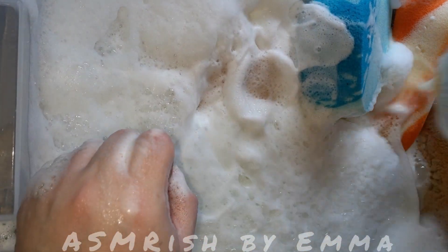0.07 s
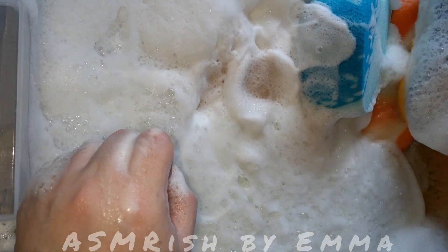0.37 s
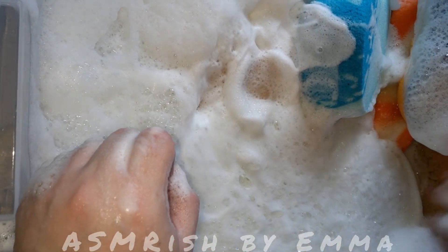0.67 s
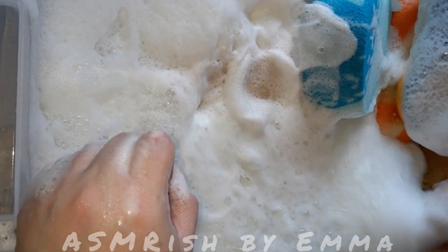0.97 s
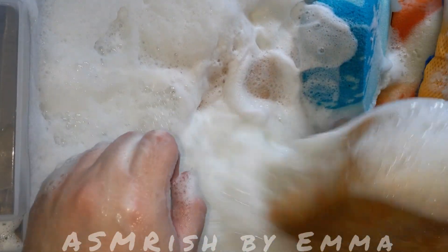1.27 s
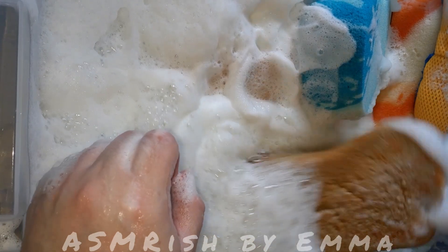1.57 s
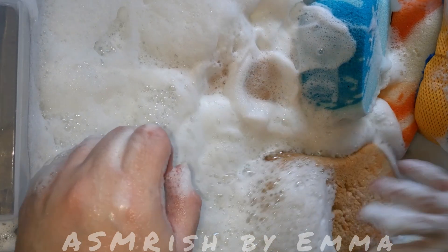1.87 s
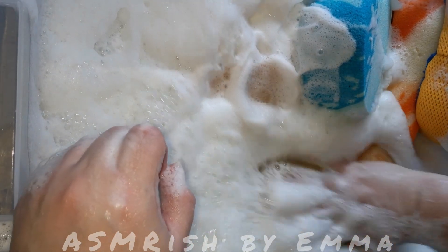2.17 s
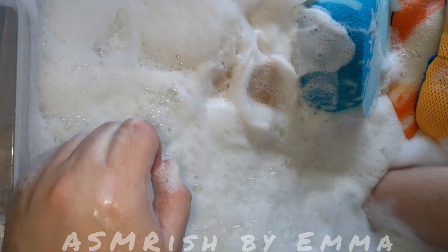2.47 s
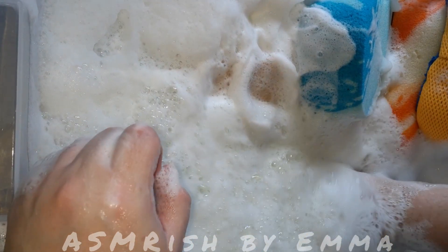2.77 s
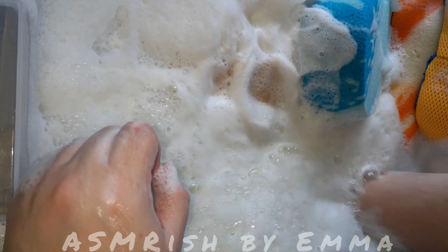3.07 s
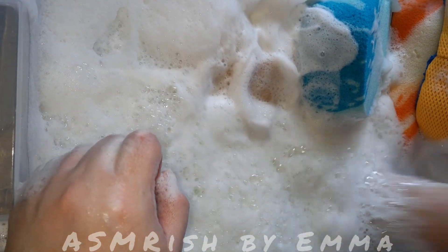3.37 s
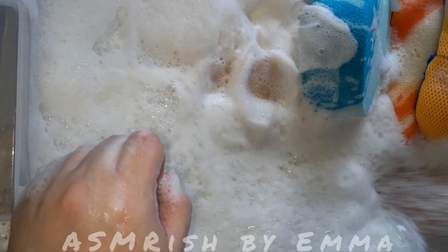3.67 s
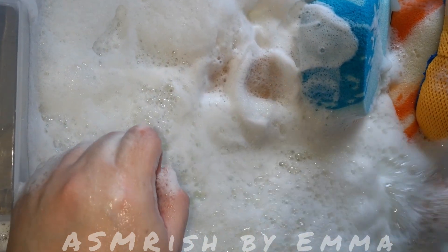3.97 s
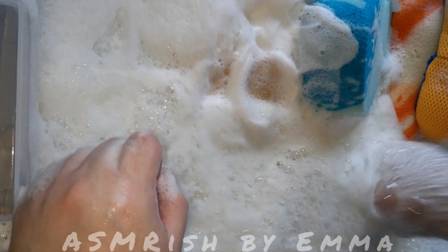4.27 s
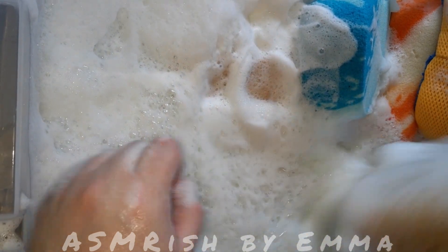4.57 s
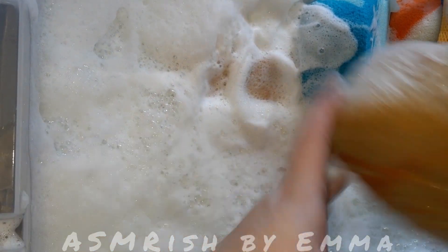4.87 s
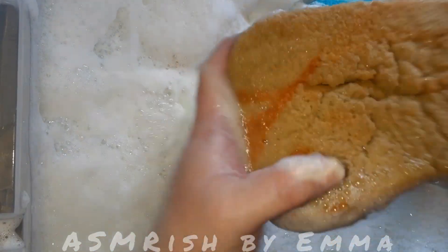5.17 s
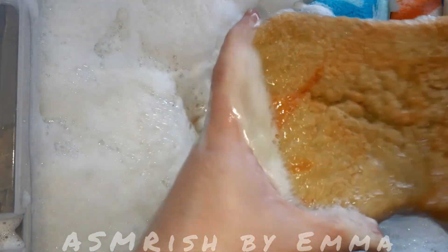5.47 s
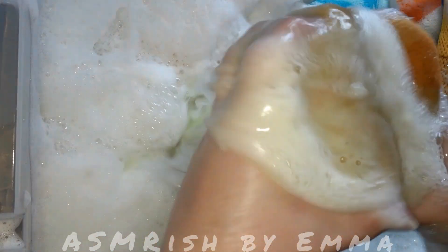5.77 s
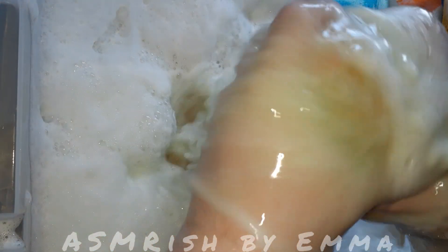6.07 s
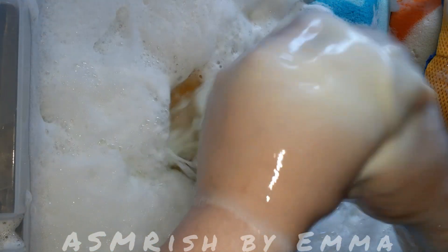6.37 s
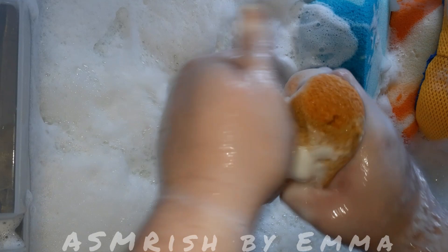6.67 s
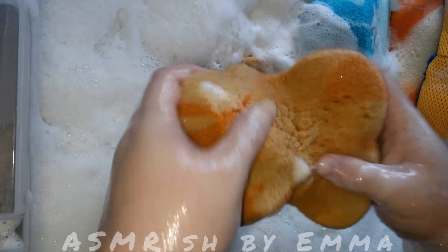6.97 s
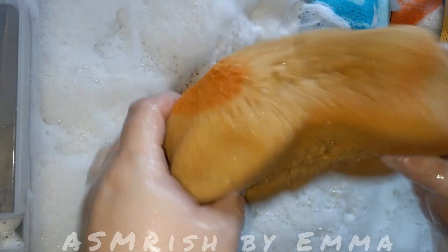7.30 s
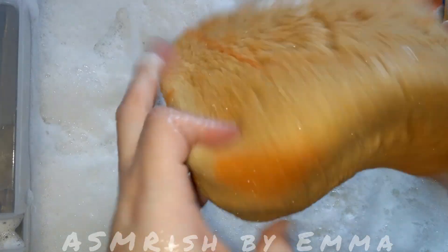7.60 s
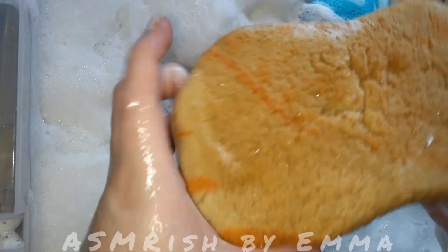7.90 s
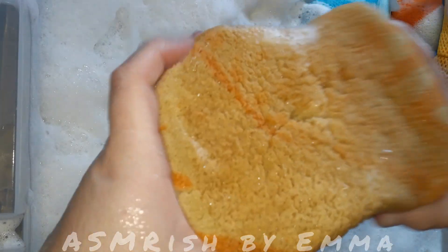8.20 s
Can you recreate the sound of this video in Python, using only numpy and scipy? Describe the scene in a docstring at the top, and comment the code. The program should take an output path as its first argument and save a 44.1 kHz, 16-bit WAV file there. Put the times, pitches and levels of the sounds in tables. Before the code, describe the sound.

Soap foam fizzes softly as a soaked sponge is pushed down in a plastic bin, gurgling, then lifted and squeezed with wet squelches.

```python
"""A sponge in thick suds

Wet hands press a sponge down in a plastic bin of suds, lift it, wring it out and let it swell again.
Each bursting bubble is a small damped resonator: thousands make the fizz of the foam, the sizzle of
the pores and the squelch of wringing. Larger air pockets throb and gulp from under the sponge.
A fan hums in the small room, and two close microphones hear the bin slightly from the left."""
import sys
import numpy as np
from scipy import signal
from scipy.fft import rfft, irfft, next_fast_len
from scipy.io import wavfile
from scipy.ndimage import uniform_filter1d

SR = 44100
rng = np.random.default_rng(int(sys.argv[2]) if len(sys.argv) > 2 else 0)


def materialize(psi):
    """Save the field psi as 16-bit PCM at rate SR to the path in sys.argv[1].

    A 1-D psi becomes a single channel; in a 2-D psi each row is a channel.
    """
    bounded = np.clip(np.atleast_2d(psi).T, -1, 1)
    quanta = np.round(bounded * 32767).astype(np.int16)
    wavfile.write(sys.argv[1], SR, quanta)


N = 372204
TIME = np.arange(N) / SR

# likeness of the room's sound at the two microphones: f/Hz, correlation
ROOM_COHERENCE = [(60, 0.91), (130, 0.96), (290, 0.55), (640, 1), (1400, 0.1), (15000, 0)]
# spectrum of flying droplets: f/Hz, gain/dB
SPRAY_SPECTRUM = [(400, -20.5), (900, -1), (1500, -4.5), (2200, -9.5), (3000, -21), (4000, -28),
                  (5300, -35), (9000, -69)]


def gain_of(db):
    """Amplitude ratio: a factor of ten per 20 dB."""
    return 10 ** (np.asarray(db) / 20)


def at_hz(points, hz):
    """Interpolation on a logarithmic frequency axis."""
    f, value = np.transpose(points)
    return np.interp(np.log(hz + 1), np.log(f + 1), value)


def envelope(rows, column=1):
    """Amplitude envelope from a dB curve, silent outside its span."""
    rows = np.asarray(rows)
    inside = (TIME >= rows[0, 0]) & (TIME <= rows[-1, 0])
    return gain_of(np.interp(TIME, rows[:, 0], rows[:, column])) * inside


def unit_rms(x):
    """Normalisation: the mean of the channels gets rms 1."""
    return x / np.sqrt(np.mean(x.mean(0) ** 2) + 1e-20)


def steadied(x, span_s):
    """Division by the running rms levels slow changes and keeps the faster grain."""
    x, size = unit_rms(x), max(int(span_s * SR), 8)
    power = uniform_filter1d(uniform_filter1d(x.mean(0) ** 2, size), size)
    return x / np.sqrt(abs(power) + 1e-6)


def add(mix, start_s, sound):
    """Superposition: a sound joins the mix at start_s."""
    part = mix[:, max(round(start_s * SR), 0):][:, :sound.shape[1]]
    part += sound[:, :part.shape[1]]


def coloured(x, spectrum):
    """Minimum-phase filtering shapes the spectrum and keeps the fronts of clicks sharp."""
    log_gain = np.log(gain_of(at_hz(spectrum, abs(np.fft.fftfreq(2048, 1 / SR)))))
    taps = np.fft.ifft(np.exp(np.conj(signal.hilbert(log_gain)))).real
    return signal.oaconvolve(x, taps[None], axes=1)[:, :x.shape[1]]


def placed(x, lead_ms, left_db):
    """Time and level differences give direction; positive values favour the left."""
    size = next_fast_len(len(x) + 64)
    delay = np.exp(-2j * np.pi * np.fft.rfftfreq(size, 1000 / SR) * lead_ms)
    late = irfft(rfft(x, size) * delay, size)[:len(x)]
    return np.array([x * gain_of(left_db / 2), late * gain_of(-left_db / 2)])


def panned(x, left_db):
    """A level difference between left and right at constant total power."""
    pair = gain_of([[left_db / 2], [-left_db / 2]])
    return x * pair / np.sqrt(np.mean(pair ** 2))


def fan(rush_db=-51, lead_ms=0.21, swell=0.28):
    """Broadband air noise, coherent in the bass, plus narrow noise bands heard as wavering tones."""
    # spectrum of the rushing air: f/Hz, gain/dB
    rush_spectrum = [(26, -55), (37, 1), (50, 4.5), (90, 6), (150, 0.5), (250, -1), (400, 0), (520, 0),
                     (800, -7), (1300, -10), (2300, -15.5), (3600, -30), (7000, -57), (16000, -42)]
    # tones of the hum: f/Hz, level/dB, half-width/Hz
    hum_tones = [(121.3, -49, 8), (60.6, -87, 7.9), (309, -65, 9.3), (397, -66, 0.82), (487, -65.5, 11)]
    # slow drift of the hum: t/s, gain/dB
    hum_drift = [(0, -1.5), (1.2, -3), (2.4, -1), (3.3, -5), (5, -2.5), (6.6, 0), (7.2, -2.5), (8.45, 2)]
    size = next_fast_len(N)
    hz = np.fft.rfftfreq(size, 1 / SR)
    left, unrelated, hum_noise = rng.standard_normal((3, len(hz))) + 1j * rng.standard_normal((3, len(hz)))
    coherence = at_hz(ROOM_COHERENCE, hz)
    delay = np.exp(-2j * np.pi * hz * lead_ms / 1000)
    right = coherence * left * delay + np.sqrt(1 - coherence ** 2) * unrelated
    rush = irfft(np.array([left, right]) * gain_of(at_hz(rush_spectrum, hz)), size)[:, :N]
    hum = np.zeros(N)
    for f, db, width in hum_tones:
        band = hum_noise / (1 + (1.05 * (hz - f) / width) ** 4)
        hum += gain_of(db) * steadied(irfft(band, size)[None, :N], 0.15)[0]
    knots = np.arange(0, N / SR, .09)
    waver = 1 + swell * np.interp(TIME, knots, rng.uniform(-0.13, 1, len(knots)))
    hum = placed(hum * waver * envelope(hum_drift), lead_ms, left_db=1.9)
    return gain_of(rush_db) * unit_rms(rush) * gain_of([[.9], [-.9]]) + hum


def room(x):
    """Diffuse reverberation from hard walls decays exponentially, fastest in the treble."""
    # reverberation time: f/Hz, T60/s
    decay_times = [(150, 0.13), (1000, 0.15), (4000, 0.078), (14000, 0.065)]
    t = np.arange(SR // 2) / SR
    reflections = rng.standard_normal((2, len(t))) * (t > .004)
    hz, when, (left, unrelated) = signal.stft(reflections, SR, nperseg=256)
    coherence = at_hz(ROOM_COHERENCE, hz)[:, None]
    right = coherence * left + np.sqrt(1 - coherence ** 2) * unrelated
    decay = gain_of(-60 * when / at_hz(decay_times, hz)[:, None])
    tail = signal.istft(np.array([left, right]) * decay, SR, nperseg=256)[1]
    return signal.fftconvolve(x, tail / np.linalg.norm(tail[0]), axes=1)[:, :N]


def bubble(hz, cycles, glide=0.031):
    """Damped resonance: a film snaps and the cavity rings briefly, rising in pitch."""
    t = np.maximum(np.arange(1200) - 24, 0) / SR
    age = t * hz / cycles
    return np.sin(2 * np.pi * hz * t * (1 + glide * np.tanh(age))) * np.exp(-age)


def swarm(rate, low_hz, high_hz, cycles, spread_db, clump_db, lead_ms, scatter_ms, left_db, sizes):
    """Shot noise: bubbles of many sizes and places burst at random, in clumps."""
    out = np.zeros((2, N))
    knots = np.arange(0, N / SR, .012)
    clumps = np.interp(TIME, knots, gain_of(clump_db * rng.standard_normal(len(knots))))
    places = rng.permutation(np.linspace(-1, 1, sizes))
    for hz, place in zip(np.geomspace(low_hz, high_hz, sizes), places):
        strength = rng.choice([-1, 1], N) * gain_of(spread_db * np.minimum(rng.exponential(1, N), 4.5))
        clicks = strength * (rng.random(N) < clumps * rate / sizes / SR)
        ring = placed(bubble(hz, cycles) * hz, lead_ms + scatter_ms * place, left_db)
        out += signal.oaconvolve(clicks[None], ring, axes=1)[:, :N]
    return out


def foam():
    """The smallest cavities resonate highest: the finest bubbles burst as a fizz."""
    # spectrum of the fizz: f/Hz, gain/dB
    spectrum = [(1500, -14), (3500, -7), (7400, -4.5), (8200, -1), (10000, -5), (13000, 3.5), (15500, 2)]
    fizz = swarm(16000, 3450, 11800, cycles=1.1, spread_db=-0.5, clump_db=2.5,
                 lead_ms=0.07, scatter_ms=0.16, left_db=1.0, sizes=14)
    return gain_of(1.34) * steadied(coloured(fizz, spectrum), 0.27)


def pores():
    """Bubble shot noise: the sponge sizzles as it draws air in and pushes it out."""
    # spectrum of the sizzle: f/Hz, gain/dB
    spectrum = [(900, -12), (2500, 1.5), (4000, -1), (5200, -4.5), (6500, -6.5), (7600, -15.5),
                (10000, -27), (15000, -27)]
    sizzle = swarm(7000, 1040, 7400, cycles=2.3, spread_db=-1, clump_db=2.2,
                   lead_ms=0.082, scatter_ms=0.23, left_db=-2.5, sizes=16)
    return gain_of(0.83) * steadied(coloured(sizzle, spectrum), 0.066)


def soaks(octaves=0.2):
    """Like-sized pores resonate in one narrow band, which rises as water fills them."""
    # one curve for each soaking of the sponge: t/s, level/dB, f/Hz
    fillings = [
        [(1.9, -76, 4450), (2.15, -70, 4440), (2.3, -69.5, 4600), (2.55, -90, 4680)],
        [(4.72, -74, 4240), (4.86, -71.5, 4400), (5.28, -73, 4830), (5.6, -73, 5400)],
    ]
    out = np.zeros((2, N))
    for rows in map(np.array, fillings):
        crackle = rng.standard_normal((2, N)) * (rng.random(N) < .1)
        hz, when, spectra = signal.stft(crackle, SR, nperseg=256)
        centre_hz = np.interp(when, rows[:, 0], rows[:, 2])
        band = np.exp(-.5 * (np.log2((hz[:, None] + 1) / centre_hz) / octaves) ** 2)
        sizzle = signal.istft(spectra * band, SR, nperseg=256)[1][:, :N]
        out += envelope(rows) * unit_rms(sizzle)
    return out


def smacks():
    """Film rupture: a wet film tears in a short spurt of band-limited impulses."""
    # skin and sponge meeting or peeling apart: t/s, level/dB, f/Hz, width/octaves, rise/s, fade/s
    contacts = [(0.483, -56.5, 1720, 0.39, 0.0078, 0.033), (1.040, -48.5, 596, 1.24, 0.005, 0.056),
                (1.097, -51, 3200, 0.76, 0.0018, 0.0063), (1.108, -48.5, 1500, 1.6, 0.004, 0.009),
                (1.250, -54, 1600, 0.62, 0.0022, .012), (1.297, -53, 2770, 0.69, 0.00092, .006),
                (2.056, -55, 2400, 1.7, 0.0034, 0.011), (3.331, -51, 2750, 0.4, 0.021, 0.022),
                (4.130, -52, 2290, 0.41, .001, 0.0097), (4.132, -37.5, 250, 0.94, 0.0032, 0.026),
                (4.605, -49, 1290, 0.63, 0.0012, 0.016), (5.868, -49.5, 2190, 0.46, 0.0034, 0.023),
                (5.921, -47, 2180, 0.44, 0.0043, 0.012), (5.969, -47, 2300, 0.55, .006, 0.017),
                (6.055, -51, 900, 0.8, 0.0095, 0.034), (6.139, -44, 2300, 0.86, 0.0027, 0.013),
                (6.168, -50, 840, 0.31, 0.0061, 0.051), (6.199, -42, 4500, 1.2, .001, .0055),
                (6.408, -46.5, 1800, 0.62, .005, 0.014)]
    out, t = np.zeros((2, N)), np.arange(SR // 5) / SR
    hz = np.fft.rfftfreq(len(t), 1 / SR) + 1
    for start, db, centre_hz, octaves, rise, fade in contacts:
        impulses = rng.standard_normal((2, len(t))) * (rng.random(len(t)) < .12)
        band = np.exp(-.5 * (np.log2(hz / centre_hz) / octaves) ** 2)
        crackle = unit_rms(irfft(rfft(impulses) * band, len(t)))
        spurt = (1 - np.exp(-(t / rise) ** 2)) * np.exp(-t / fade)
        add(out, start, gain_of(db) * crackle * spurt / spurt.max())
    return out


def squelch():
    """Larger cavities resonate lower: wrung suds tear into coarse bubbles."""
    # spectrum of the squelch: f/Hz, gain/dB
    spectrum = [(120, -1), (300, 7), (750, 8), (1200, 4), (1700, 8), (2600, 5), (3300, -4.5), (5000, 0.5),
                (12000, -41)]
    bursts = swarm(3000, 262, 4680, cycles=0.96, spread_db=4.5, clump_db=2.0,
                   lead_ms=0.072, scatter_ms=0.32, left_db=1.0, sizes=20)
    return gain_of(-0.5) * steadied(coloured(bursts, spectrum), 0.45)


def stroke(start, length, rise_s=0.018, fade_s=0.032):
    """Drive and relaxation: a hand gets moving, keeps on, and the suds settle behind it."""
    age = np.maximum(TIME - start, 0)
    onset = 1 - np.exp(-np.minimum(age / rise_s, 10) ** 2)
    return onset * np.exp(-np.minimum(np.maximum(age - length, 0) / fade_s, 20))


def flex(peak, swell, relax, roundness=1.39):
    """Loading and release: the grip tightens up to a peak and lets go."""
    distance = np.maximum((peak - TIME) / swell, (TIME - peak) / relax)
    return np.exp(-np.minimum(distance, 10) ** roundness)


def handling():
    """Incoherent powers add: all hand movements sum to stereo gains for foam, pores and squelch."""
    # suds at rest, quieter while the sponge is held under: t/s, foam/dB, pores/dB
    resting = [(0, -68, -70), (2.7, -69.5, -74), (2.87, -74.5, -98), (4.45, -69.5, -74),
               (4.7, -67.5, -72.5), (6.6, -64, -64.5), (8.44, -68, -66)]
    # a hand sweeping through the suds: t/s, length/s, foam/dB, pores/dB
    strokes = [(.07, .05, -68, -69), (0.168, 0.16, -66.5, -66.5), (0.644, .4, -65.5, -65),
               (1.06, 0.094, -62.5, -61), (1.184, 0.12, -64.5, -64), (1.535, 0.2, -69, -66.5),
               (2.01, 0.071, -65, -63.5), (2.093, 0.39, -69, -65.5), (2.696, 0.12, -70.5, -70),
               (2.968, 0.15, -71.5, -75), (3.304, 0.12, -70.5, -64), (3.663, .17, -75, -77),
               (4.1, 0.11, -72.5, -69), (4.31, 0.1, -72, -82), (4.5, 0.16, -66.5, -64.5)]
    # fingers bending the lifted sponge: peak t/s, swell/s, relax/s, foam/dB, pores/dB, squelch/dB
    flexes = [(5.26, 0.22, 0.16, -86, -64, -59.5), (5.77, 0.18, 0.055, -60.5, -58, -52.5),
              (6.71, 0.085, 0.11, -52, -55, -55), (7.03, 0.043, 0.039, -59, -60.5, -72),
              (7.4, 0.07, 0.034, -61.5, -65, -72), (7.575, 0.045, 0.12, -58, -63, -57.5),
              (7.837, 0.053, 0.033, -52.5, -58.5, -52), (8.44, 0.19, .1, -48.5, -50.5, -48.5)]
    # effort of the long wring with both fists: t/s, level/dB
    wring_effort = [(5.84, -63), (5.882, -57), (6.084, -48.5), (6.13, -55), (6.14, -48.5), (6.412, -53),
                    (6.54, -64.5)]
    stroke_shapes = np.array([stroke(*row[:2]) for row in strokes])
    flex_shapes = np.array([flex(*row[:3]) for row in flexes])
    at_rest = np.array([envelope(resting, column=1), envelope(resting, column=2)]) ** 2
    in_bin = at_rest + gain_of(np.array(strokes)[:, 2:].T) ** 2 @ stroke_shapes ** 2
    flexed = gain_of(np.array(flexes)[:, 3:].T) ** 2 @ flex_shapes ** 2
    wrung = (gain_of([[-4.5], [-4.5], [5.5]]) * envelope(wring_effort)) ** 2  # foam, pores, squelch
    power = np.zeros((3, 2, N))
    for part, left_db in (in_bin, 5), (flexed, 6.5), (wrung, 0.5):
        power[:len(part)] += part[:, None] * panned(0.98, left_db) ** 2
    return np.sqrt(power)


def pops():
    """Impulse excitation: a tearing film ticks and sets a single large bubble ringing."""
    # bursts that stand out: t/s, level/dB, f/Hz, decay/cycles
    bursts = [(0.176, -42, 3220, 5), (1.112, -32, 4180, 1.1), (1.299, -42, 3020, 1.1),
              (5.532, -35.5, 6200, 1.3), (5.772, -38, 2200, 1.2), (5.981, -24.5, 2180, 2),
              (6.004, -28, 1500, 1.3), (6.065, -25, 2060, 0.92), (6.090, -21.5, 2460, 0.79),
              (6.136, -26, 2110, 2), (6.1425, -22, 1740, 1.2), (6.1544, -19.5, 2320, 1.7),
              (6.173, -24, 5500, .6), (6.201, -26, 3600, 0.71), (6.213, -30, 1980, 2.5),
              (6.265, -21, 1890, 1), (6.345, -34, 1420, 1.8), (6.418, -30, 1680, 2.2),
              (6.489, -36, 2140, 1.8)]
    out = np.zeros((2, N))
    for (start, db, hz, cycles), place in zip(bursts, rng.standard_normal(len(bursts))):
        pop = bubble(hz, cycles) + 0.33 * bubble(7000, 0.79)
        add(out, start, placed(gain_of(db) * pop, lead_ms=0.038 + 0.087 * place, left_db=-1.0))
    return out


def bin_ring(contact_s=0.0024):
    """Modal vibration: the plastic bin answers a soft, wet blow with decaying sinusoids."""
    # modes of the bin: f/Hz, level/dB, T60/s
    modes = [(363, -10.5, 0.062), (456, -3, 0.044), (574, 16, 0.037), (760, -1, 0.067), (984, -6, 0.12),
             (1200, -1, 0.062), (1454, 11.5, 0.02), (1650, -7, 0.051), (1840, -22, 0.12),
             (2067, 9.5, 0.019), (2353, -8, 0.089)]
    t = np.arange(SR // 4) / SR
    ring = sum((-1) ** k * gain_of(db - 60 * t / t60) * np.sin(2 * np.pi * hz * t)
               for k, (hz, db, t60) in enumerate(modes))
    ring = placed(ring, lead_ms=0.17, left_db=1.3) * (1 - np.exp(-(t / contact_s) ** 2))
    return ring / abs(ring).max()


def airflow():
    """Power laws of one arch of escaping air per press give the gains of throb, splutter and spray."""
    # pushes on the sponge: t/s, length/s, throb/dB, splutter/dB, spray/dB
    pushes = [(1.532, 0.29, -62, -51.5, -68), (2.141, 0.16, -52, -50.5, -70),
              (2.285, 0.23, -48.5, -39, -51.5), (2.659, 0.13, -30, -28.5, -41),
              (2.877, 0.21, -41.5, -48.5, -73), (3.295, 0.11, -19, -30, -44),
              (3.395, 0.078, -48, -48.5, -57)]
    out = np.zeros((3, N))
    for start, length, throb_db, splutter_db, spray_db in pushes:
        progress = np.arange(0, 1, 1 / (length * SR))
        arch = abs(np.sin(np.pi * progress))
        late_arch = abs(np.sin(np.pi * progress ** 1.22))
        throb = gain_of(throb_db) * late_arch ** 1.64
        splutter = gain_of(splutter_db) * arch ** 2.1
        spray = gain_of(spray_db) * arch ** 2.8  # finer spatter keeps closer to the peak flow
        add(out, start, np.array([throb, splutter, spray]))
    return out


def presses(wander=0.0506):
    """Amplitude modulation: air pockets throb under the sponge and spit suds against the bin in pulses."""
    # resonances of the air pockets: f/Hz, level/dB
    pockets = [(186, -0.5), (145, -6.5), (112, -16), (240, -19)]
    # spectrum of spatter muffled by thick foam: f/Hz, gain/dB
    splutter_spectrum = [(120, -13), (260, -6), (350, 2.5), (460, 0), (590, -12), (780, -8), (1200, -36),
                         (3000, -53.5)]
    throb_gain, splutter_gain, spray_gain = airflow()
    knots = np.arange(0, N / SR, .008)
    phases = []
    for hz, _ in pockets:
        drift = np.interp(TIME, knots, rng.standard_normal(len(knots)))
        phases.append(2 * np.pi * np.cumsum(hz * (1 + wander * drift)) / SR)
    throb = sum(gain_of(db) * np.sin(phase) for (_, db), phase in zip(pockets, phases))
    throb = throb_gain * unit_rms(placed(throb, lead_ms=0.1, left_db=.2))
    spits = swarm(7000, 221, 4260, cycles=1.2, spread_db=2.5, clump_db=1.0,
                  lead_ms=0.21, scatter_ms=0.056, left_db=5.0, sizes=18)
    spits *= 1 + .5 * np.sin(phases[0])  # in step with the strongest pocket
    spits += gain_of(-15) / 4 * signal.oaconvolve(spits, bin_ring(), axes=1)[:, :N]
    splutter = splutter_gain * steadied(coloured(spits, splutter_spectrum), 0.0024)
    spray = spray_gain * steadied(coloured(spits, SPRAY_SPECTRUM), 0.0089)
    return gain_of(-4.0) * throb + gain_of(-1.0) * splutter + gain_of(3.5) * spray


def gulps(sag=0.1, sag_s=0.12, slap_t60=0.047):
    """Cavity resonance: a wet slap knocks the bin, then an air pocket swells and its note sinks."""
    # single escapes of air under the suds: t/s, level/dB, f/Hz, T60/s, rise/s, slap/dB
    escapes = [(0.698, -22, 96, 0.11, 0.016, -49), (1.043, -34.5, 168, 0.084, 0.0051, -38),
               (1.111, -33, 333, 0.032, .002, -35.5), (2.650, -43, 170, .05, .003, -37.5),
               (2.6825, -11, 165, 0.051, 0.0068, -30), (2.721, -14, 350, 0.039, 0.0022, -32),
               (2.747, -20.5, 131, 0.089, 0.0032, -48), (2.916, -43, 328, 0.085, .003, -47),
               (2.972, -33, 170, .14, 0.0044, -53), (2.987, -35, 300, .05, .002, -42),
               (3.107, -33.5, 168, 0.068, 0.006, -66), (3.309, -29, 190, .05, .002, -34),
               (4.1299, -15, 128, 0.047, 0.0046, -21.5), (4.608, -20, 155, 0.036, 0.0027, -36.5),
               (6.346, -33, 155, 0.094, 0.008, -46), (6.434, -29, 138, 0.081, 0.014, -56)]
    out, ring = np.zeros((2, N)), bin_ring()
    t = np.arange(ring.shape[1]) / SR
    for start, db, hz, t60, rise, slap_db in escapes:
        phase = 2 * np.pi * np.cumsum(hz * (1 - sag / 2 + sag * np.exp(-t / sag_s))) / SR
        pocket = gain_of(db - 60 * t / t60) * (1 - np.exp(-t / rise)) * np.sin(phase)
        splash = coloured(rng.standard_normal((2, len(t))) * gain_of(-60 * t / slap_t60), SPRAY_SPECTRUM)
        slap = gain_of(slap_db) * (ring + gain_of(-8.0) * splash)
        add(out, start, placed(pocket, lead_ms=0.075, left_db=0.58) + slap)
    return out


def scene():
    """Superposition of the direct sound of suds and sponge, its reverberation and the fan."""
    foam_gain, pore_gain, squelch_gain = handling()
    suds = foam_gain * foam() + pore_gain * pores() + squelch_gain * squelch()
    direct = suds + soaks() + panned(smacks(), left_db=4.0) + presses() + gulps() + pops()
    return direct + gain_of(-12.0) * room(direct) + fan()


def record(dry, edge_hz=15880):
    """Linear filtering: each microphone's frequency response, then a low-pass band limit."""
    # response of the left microphone: f/Hz, gain/dB
    left_response = [(200, -1.22), (400, -2.5), (1500, -0.5), (7000, -0.73), (10000, 0), (13000, -2.8),
                     (15500, -2)]
    # response of the right microphone: f/Hz, gain/dB
    right_response = [(200, -1), (400, -0.5), (1500, 0), (7000, 0.1), (9500, 3.2), (11400, 1.3),
                      (12900, -4), (13400, -13.5), (15500, 5)]
    heard = np.vstack([coloured(dry[:1], left_response), coloured(dry[1:], right_response)])
    low_pass = signal.firwin(511, edge_hz, window=("kaiser", 9), fs=SR)
    return signal.oaconvolve(heard, low_pass[None], "same")


dry = scene()
out = record(dry)
materialize(out)
```